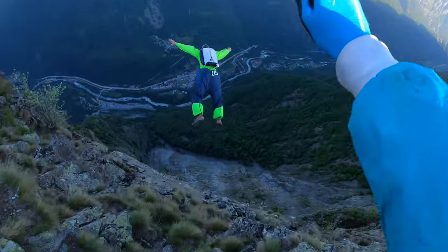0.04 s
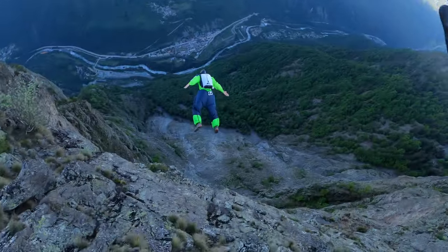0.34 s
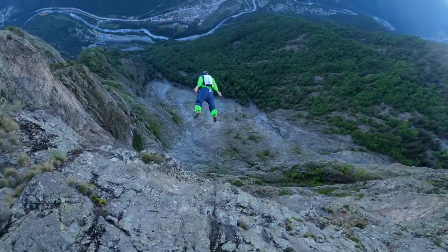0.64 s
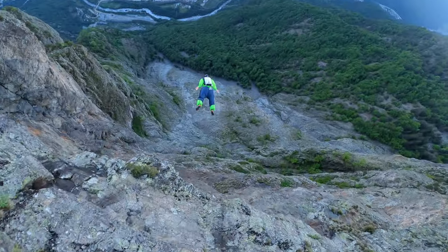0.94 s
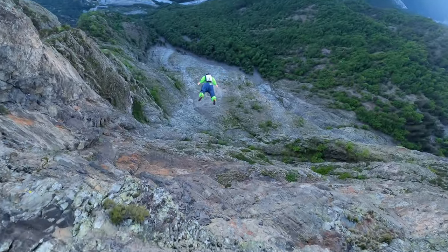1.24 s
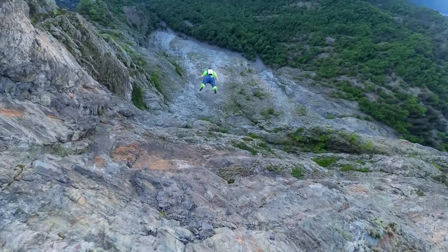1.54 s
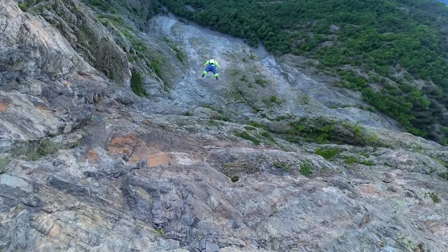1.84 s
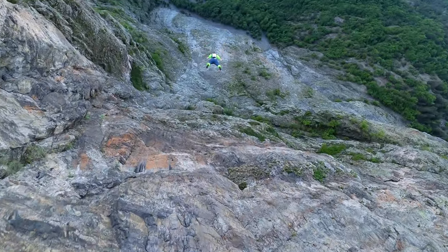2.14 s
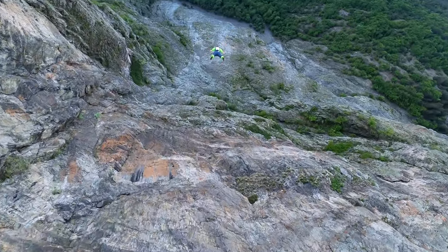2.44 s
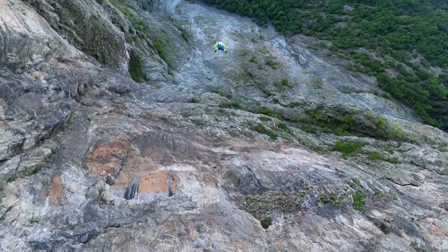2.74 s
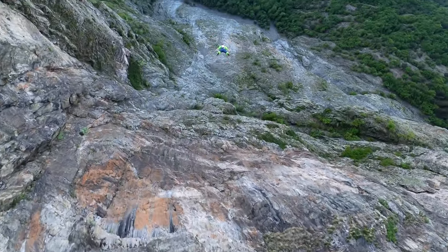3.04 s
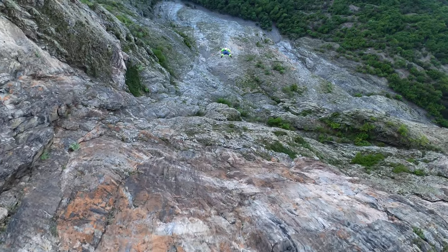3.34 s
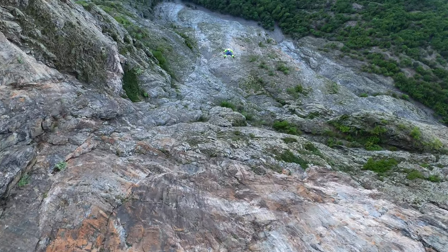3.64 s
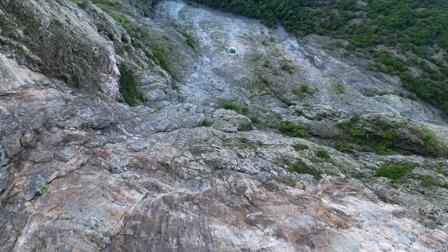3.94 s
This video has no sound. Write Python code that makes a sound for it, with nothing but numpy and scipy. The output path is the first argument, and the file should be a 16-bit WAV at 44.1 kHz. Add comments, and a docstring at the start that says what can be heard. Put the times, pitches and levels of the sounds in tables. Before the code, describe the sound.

Wind buffets the microphone, building from dull thumps to a tearing crackle during a fall.

```python
"""Cliff jump, worn microphone

Clothing rustles, harness fittings knock and a buckle clinks at the push-off, then a first gust hits.
Eddies strike the microphone port as single pressure pulses over heavy buffeting and a smooth hiss.
As the fall gathers speed they get sharper, from dull thumps to a tearing crackle."""
import sys
import numpy as np
from scipy import signal
from scipy.fft import rfft, irfft
from scipy.io import wavfile
from scipy.ndimage import uniform_filter1d, minimum_filter1d

SR = 44100
rng = np.random.default_rng(int(sys.argv[2]) if len(sys.argv) > 2 else 0)


def file_out(sig):
    """Save sig as 16-bit WAV at sys.argv[1]."""
    # one column per channel
    cols = np.atleast_2d(sig).T
    # limit, then scale
    lim = np.clip(cols, -1, 1)
    pcm = np.round(lim * 32767).astype(np.int16)
    wavfile.write(sys.argv[1], SR, pcm)


N = 176400

# Clothing rustle envelope: time_s, level_db
RUSTLE_ENVELOPE = [(0, -34.5), (.06, -40.5), (.145, -31), (.19, -37.5), (.23, -33), (.26, -43.5),
                   (.34, -45), (.42, -59), (.5, -58.5), (.6, -49), (.72, -55.5), (.9, -54.5), (1.1, -90)]
# Tone of the cloth: frequency_hz, relative_db
RUSTLE_EQ = [(300, -2), (1000, 8), (2500, 3), (4500, -3), (6500, -14), (8500, -21), (10500, -32.5),
             (14000, -54.5)]
# Low buffeting envelope: time_s, level_db
BUFFET_ENVELOPE = [(0, -22), (.15, -18.5), (.29, -28.5), (.39, -19.5), (.6, -19), (.8, -17.5), (.97, -21),
                   (1.3, -21), (1.55, -23.5), (2.1, -17.5), (2.3, -21.5), (2.92, -17.5), (3, -24),
                   (3.1, -18.5), (3.55, -21.5), (3.65, -25.5), (3.85, -17.5), (4, -18)]
# Buffeting in slow air: frequency_hz, relative_db
SLOW_BUFFET_EQ = [(15, -8.5), (30, -9), (65, 1.5), (120, -4), (190, -8.5), (310, -8.5), (450, -13.5),
                  (700, -29), (2000, -88.5)]
# Buffeting in fast air: frequency_hz, relative_db
FAST_BUFFET_EQ = [(15, -23.5), (30, -10.5), (65, -1), (130, -0.5), (220, -7), (350, -14.5), (700, -52.5),
                  (2000, -91)]
# Air over the port: time_s, speed_m_per_s, eddy_drive_db
AIRFLOW = [(0, 11.6, -24), (.06, 8, -26), (.11, 8, -17.5), (.155, 7, -16), (.22, 5.7, -28), (.36, 4, -28.5),
           (.395, 11, -20.5), (.46, 11.1, -24), (.5, 9.5, -24.5), (.62, 9.25, -21), (.8, 8.5, -22),
           (.97, 5.35, -21.5), (1.18, 5.5, -23), (1.29, 5.6, -20.5), (1.35, 5.3, -20.5),
           (1.55, 8.06, -22.5), (1.77, 8.5, -22), (1.85, 12, -21.5), (2.03, 14.5, -22), (2.37, 14.3, -21),
           (2.52, 17, -19.5), (2.65, 18.2, -17), (2.72, 18.5, -20.5), (2.78, 22, -18), (2.9, 24, -21),
           (2.97, 27, -22), (3.1, 26, -20), (3.23, 25, -23), (3.31, 34, -22), (3.47, 37, -22.5),
           (3.62, 35, -22), (3.72, 35, -22.5), (3.86, 34.7, -19.5), (4, 32, -25.5)]
# Tone of the eddies: frequency_hz, relative_db
EDDY_EQ = [(30, -9.5), (100, -5.5), (200, -1), (400, 1), (700, -3), (1100, -5.5), (2000, -13.5),
           (4000, -17), (8000, -28)]
# The hardest slaps of air: start_s, strength_db, treble_edge_hz
HARD_SLAPS = [(0.471, -12, 2200), (0.518, -9.5, 2000), (0.535, -6.5, 1500), (0.577, -2, 1770),
              (0.608, -6.5, 1300), (0.664, -6.5, 1400), (.695, -0.5, 1450), (.745, -12, 1700),
              (0.852, -5, 1350), (0.8969, -5.5, 1200), (1.315, -6, 1600), (1.392, -8.5, 750),
              (1.453, -13, 1000), (1.494, -7.5, 1300), (1.586, -6.5, 1350), (1.744, -2.5, 1150),
              (1.83, -5, 1750), (1.973, -12, 1700), (1.999, -7, 3000), (2.017, -7, 2200),
              (2.054, -10, 3200), (2.139, -5.5, 2200), (2.321, -6.5, 2700), (2.404, -5.5, 2400),
              (2.578, -12, 3300), (3.2, -8.5, 4500), (3.292, -7.5, 3400), (3.311, -5.5, 4000),
              (3.333, -9, 5000), (3.3998, -7, 3800), (3.461, -7.5, 3200), (3.478, -10, 4300),
              (3.539, -6.5, 3200), (3.573, -2, 3700), (3.706, -4, 3200), (3.725, -7.5, 7000),
              (3.962, -6, 2500)]
# Level of the hiss: time_s, level_db
HISS_ENVELOPE = [(0, -46), (.45, -69.5), (.6, -77), (.8, -58), (.95, -48.5), (1.15, -41.5), (1.3, -42),
                 (1.4, -40.5), (1.47, -43.5), (1.55, -36.5), (1.71, -37.5), (1.735, -44.5), (1.85, -38.5),
                 (1.9, -43.5), (2.2, -45), (3, -40), (3.7, -40), (4, -39)]
# Tone of the hiss: frequency_hz, relative_db
HISS_EQ = [(300, -19), (1000, 10.5), (1700, 6.5), (3200, -1), (4500, -3), (6000, -6), (7600, -9),
           (9000, -24), (14000, -45.5)]
# Hits on the harness fittings: start_s, strength_db
FITTING_HITS = [(.005, -21), (.0105, -14.5), (.013, -29), (.228, -32)]
# Ring of a fitting: pitch_hz, gain_db, t60_s
FITTING_MODES = [(1780, -4.5, 0.02), (2270, 1.5, 0.0077), (2720, -14, 0.015), (3700, -10, 0.011),
                 (4750, -20, 0.013)]
# Hits on the buckle: start_s, strength_db
BUCKLE_HITS = [(.035, -34), (.236, -27), (.287, -44)]
# Ring of the buckle: pitch_hz, gain_db, t60_s
BUCKLE_MODES = [(5440, -6.5, 0.058), (5370, -18, 0.04), (5600, -19, .02), (9700, -21, .025)]
# First gust envelope: time_s, level_db
GUST_ENVELOPE = [(.3, -67), (.372, -43), (.395, -22.5), (.465, -21), (.5, -30), (.535, -23.5), (.57, -37.5),
                 (.62, -52), (.9, -98)]
# Tone of the gust: frequency_hz, relative_db
GUST_EQ = [(150, -20), (400, 2), (1000, -4), (1700, -13), (2500, -29.5), (4000, -47.5), (7000, -69)]
# Dull thumps in slower air: centre_s, peak_db, half_width_ms
DULL_THUMPS = [(0.948, -6.5, 0.71), (1.009, -12, 0.68), (1.053, -8, .8), (1.157, -15, 0.96),
               (1.225, -10, 0.58), (1.244, -11.5, 1.8), (1.3007, -7.5, 0.98), (1.35, -12, 1.3),
               (1.426, -7, 1.13), (1.454, -11.5, 0.76), (1.604, -12, 1.3), (1.654, -8.5, 0.61),
               (1.72, -7, 0.74), (1.875, -5.5, 0.78), (2.105, -11, 1.2), (2.234, -7, 0.64),
               (2.371, -7.5, 0.85)]

FAST_M_PER_S, BREAKUP_DB_PER_DOUBLING = 18.9, 1.87
EDGE_HZ_PER_M_PER_S = 96.7  # the treble edge rises with air speed
SHARPEST_HZ = 4870  # ceiling on that edge for eddies and lesser slaps
EDDIES_PER_S, EDDY_SPREAD_DB = 1600, 3
SWIRL_HZ, SWIRL_OCTAVES, SWIRL_DB = 121, 0.06, 3  # quick swings of the flow
SURGE_HZ, SURGE_OCTAVES, SURGE_DB = 5.6, 0.07, 0.84  # slower swings
SCATTER_OCTAVES, SUCTION_OCTAVES, WIDEST_OCTAVES = 0.23, 0.59, 0.98  # swing of an eddy's edge
SHED_PER_S, SHED_PER_M = 45, 3.5  # lesser slaps: base rate, plus more per metre of passing air
SHED_DB, SHED_SPREAD_DB, SHED_OCTAVES = 8.5, 1.5, 0.21
SLAP_GAIN_DB, CRACK_LOW_HZ, CRACK_BODY_HZ = 2.5, 320, 526
THUD_HZ, THUD_T60_S, THUD_DB = 192, 0.016, -5.5
MIC_LOW_HZ, MIC_EDGE_HZ = 6.6, 10000
LIMIT_DB, RELEASE_DB_PER_S, CUTOFF_HZ = -3.6, 115.5, 14000


def from_db(db):
    """Decibels to gain."""
    return 10 ** (np.asarray(db) / 20)


def rms_one(x):
    """Scale to rms 1."""
    return x / np.sqrt(np.mean(x ** 2) + 1e-20)


def automation(rows):
    """Each column of a breakpoint curve, at every sample."""
    times, *columns = np.transpose(rows)
    return [np.interp(np.arange(N) / SR, times, column) for column in columns]


def equalise(x, eq):
    """Apply an EQ curve, scaled so that white noise keeps its power."""
    hz, db = np.transpose(eq)
    bin_hz = np.arange(N + 1) * SR / (2 * N)
    gain = from_db(np.interp(np.log(bin_hz + 1), np.log(hz), db))
    return irfft(rfft(x, 2 * N) * rms_one(gain))[:N]


def cut(x, hz, kind="low", order=2):
    """Butterworth low- or high-pass."""
    edge = np.clip(hz, 10, .45 * SR)
    return signal.sosfilt(signal.butter(order, edge, kind, fs=SR, output="sos"), x + 1e-18)


def drift(hz):
    """Random modulation up to about this rate, rms 1, its extremes softened."""
    wander = rms_one(cut(rng.standard_normal(2 * N), hz)[N:])
    return rms_one(np.tanh(wander / 1.5))


def clicks(hits):
    """One impulse for each (start_s, strength_db)."""
    out = np.zeros(N)
    for start_s, db in hits:
        out[int(np.clip(start_s * SR, 0, N - 1))] += from_db(db)
    return out


def ring(x, hz, t60_s):
    """Resonator: each impulse starts a decaying sine of its own height."""
    decay, angle = from_db(-60 / (t60_s * SR)), 2 * np.pi * hz / SR
    return signal.lfilter([0, np.sin(angle)], [1, -2 * decay * np.cos(angle), decay ** 2], x + 1e-18)


def rounded(pulses, edge_octave):
    """Round off each impulse at its own treble edge (log2 Hz) by blending low-passes."""
    edge = np.minimum(edge_octave, np.log2(SHARPEST_HZ))
    return sum(cut(pulses * np.maximum(1 - 2 * abs(edge - step), 0), 2 ** step, order=4)
               for step in np.arange(7, 14, .5))


def noise_layer(envelope, eq, flutter_db, flutter_hz):
    """Shaped noise, fluttering in level."""
    grain = rms_one(rng.standard_normal(N) * from_db(flutter_db * drift(flutter_hz)))
    return from_db(automation(envelope)[0]) * equalise(grain, eq)


def breakup_db(speed):
    """Faster air tears into harder pulses: the balance tips from eddies to slaps."""
    return BREAKUP_DB_PER_DOUBLING * np.log2(speed / FAST_M_PER_S)


def clothing_rustle():
    """Cloth rubs at the push-off with a fine, dry grain."""
    return noise_layer(RUSTLE_ENVELOPE, RUSTLE_EQ, flutter_db=2.0, flutter_hz=360)


def buffeting(speed):
    """Broad pressure swings, rms about 1; their weight moves up in pitch as the air gets faster."""
    blend = np.clip(speed / FAST_M_PER_S, 0, 1) ** 2
    slow_air = equalise(rng.standard_normal(N), SLOW_BUFFET_EQ)
    fast_air = equalise(rng.standard_normal(N), FAST_BUFFET_EQ)
    return np.sqrt(1 - blend) * slow_air + np.sqrt(blend) * fast_air


def eddies(speed, drive_db, pressure):
    """Each small eddy is one pressure pulse; the faster it crosses the port, the brighter it is."""
    swirl, surge = drift(SWIRL_HZ), drift(SURGE_HZ)
    scatter = np.clip(rng.standard_normal(N), -2, 2)
    triggers = rng.random(N) < EDDIES_PER_S / SR
    accent_db = EDDY_SPREAD_DB * scatter + SWIRL_DB * swirl + SURGE_DB * surge
    pulses = rms_one(triggers * rng.choice([-1, 1], N) * from_db(accent_db))
    pulses *= from_db(drive_db - np.maximum(breakup_db(speed), 0))
    swing = SWIRL_OCTAVES * swirl + SURGE_OCTAVES * surge + SCATTER_OCTAVES * (scatter - .5)
    swing -= SUCTION_OCTAVES * pressure  # sharper while the buffet sucks
    swing = WIDEST_OCTAVES * np.tanh(swing / WIDEST_OCTAVES)
    return equalise(rounded(pulses, np.log2(EDGE_HZ_PER_M_PER_S * speed) + swing), EDDY_EQ)


def slaps(speed, drive_db):
    """Large eddies break away unevenly: a crack of pressure with a low thud of suction behind it."""
    slaps_per_s = (SHED_PER_S + SHED_PER_M * speed) * from_db(5 * drift(hz=120))
    triggers = np.diff(np.floor(np.cumsum(slaps_per_s) / SR), prepend=0) > 0
    scatter = np.clip(rng.standard_normal(N), -1.5, 1.5)
    lesser = triggers * from_db(drive_db + SHED_DB + breakup_db(speed) + SHED_SPREAD_DB * scatter)
    edge_octave = np.log2(EDGE_HZ_PER_M_PER_S * speed) + SHED_OCTAVES * scatter
    hardest = sum(cut(clicks([(start_s, db)]), hz, order=4) for start_s, db, hz in HARD_SLAPS)
    pulses = rounded(lesser, edge_octave) + hardest
    makeup = SR / (2 * np.pi * CRACK_BODY_HZ)  # restores an impulse's height after the low-pass
    crack = makeup * cut(cut(pulses, CRACK_BODY_HZ, order=1), CRACK_LOW_HZ, "high")
    thud = cut(ring(pulses, THUD_HZ, THUD_T60_S), 44, "high", order=1)
    return from_db(SLAP_GAIN_DB) * (crack - from_db(THUD_DB) * thud)


def hiss():
    """A smooth hiss swells, drops back suddenly, then holds steady."""
    return noise_layer(HISS_ENVELOPE, HISS_EQ, flutter_db=2.0, flutter_hz=22)


def struck_hardware(hits, modes):
    """Hits set a harness fitting or buckle ringing briefly in its modes."""
    return sum(from_db(db) * ring(clicks(hits), hz, t60_s) for hz, db, t60_s in modes)


def first_gust():
    """The first rush of air hits as a dense rasp."""
    return noise_layer(GUST_ENVELOPE, GUST_EQ, flutter_db=4.5, flutter_hz=280)


def thumps():
    """A big slow eddy crosses the port: one swing of suction, then its rebound."""
    out = np.zeros(N)
    for centre_s, peak_db, half_width_ms in DULL_THUMPS:
        offset = np.clip((np.arange(N) / SR - centre_s) / (half_width_ms / 1000), -8, 8)
        out += from_db(peak_db) * offset * np.exp((1 - offset ** 2) / 2)
    return out


def scene():
    """Mono mix: wind at the port, a smooth hiss, and the gear at the push-off."""
    speed, drive_db = automation(AIRFLOW)
    pressure = buffeting(speed)
    buffet = pressure * from_db(automation(BUFFET_ENVELOPE)[0])
    wind = buffet + first_gust() + eddies(speed, drive_db, pressure) + slaps(speed, drive_db) + thumps()
    wind = cut(wind, MIC_EDGE_HZ, order=5)
    knocks = struck_hardware(FITTING_HITS, FITTING_MODES)
    clinks = struck_hardware(BUCKLE_HITS, BUCKLE_MODES)
    hardware = cut(knocks + clinks, MIC_EDGE_HZ, order=3)
    return cut(wind + hiss() + clothing_rustle() + hardware, MIC_LOW_HZ, "high", order=1)[None]


def record(dry):
    """A fast limiter holds the peaks down and a steep low-pass trims the top."""
    over_db = np.maximum(20 * np.log10(abs(dry[0]) + 1e-9) - LIMIT_DB, 0)
    release_db = RELEASE_DB_PER_S * np.arange(N) / SR
    reduction_db = np.maximum.accumulate(over_db + release_db) - release_db
    gain_db = uniform_filter1d(minimum_filter1d(-reduction_db, size=129), size=129)  # 3 ms look-ahead
    return cut(dry * from_db(gain_db), CUTOFF_HZ, order=12)


dry = scene()
out = record(dry)
file_out(out)
```